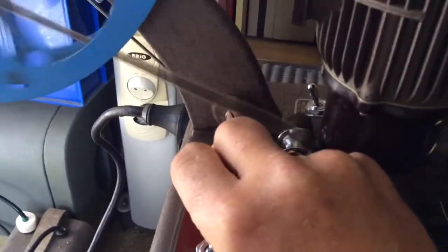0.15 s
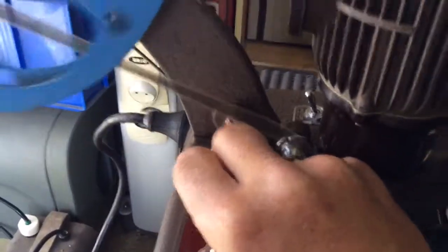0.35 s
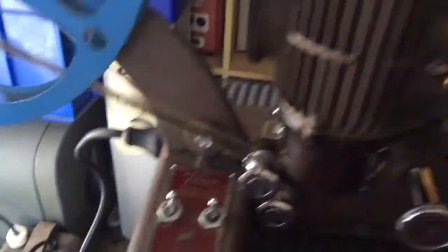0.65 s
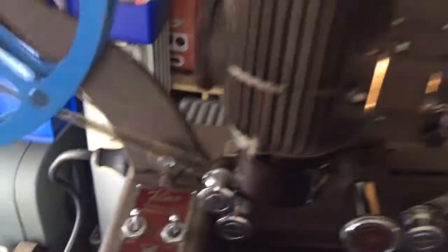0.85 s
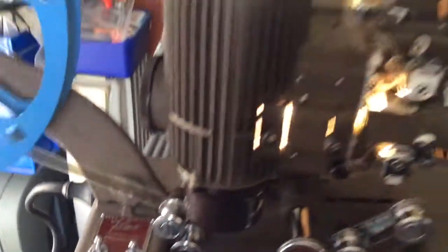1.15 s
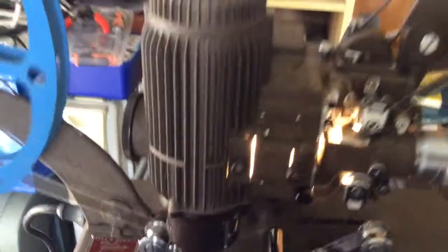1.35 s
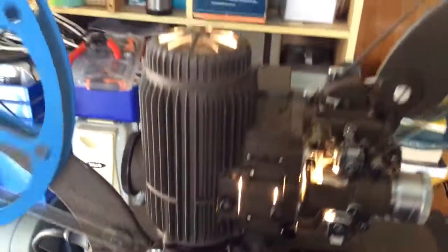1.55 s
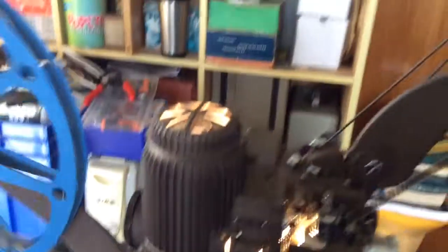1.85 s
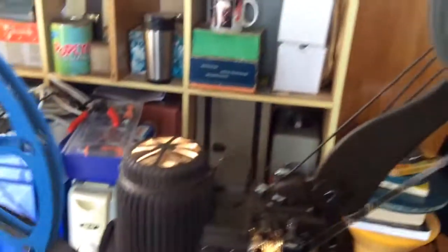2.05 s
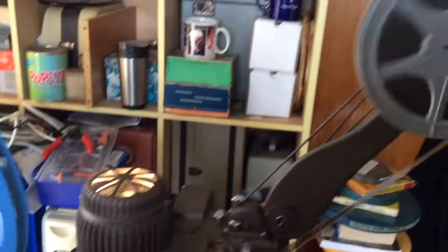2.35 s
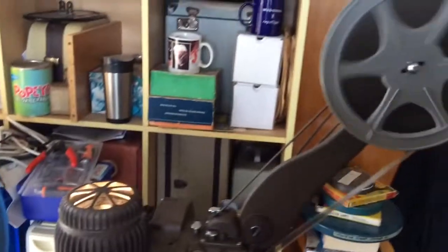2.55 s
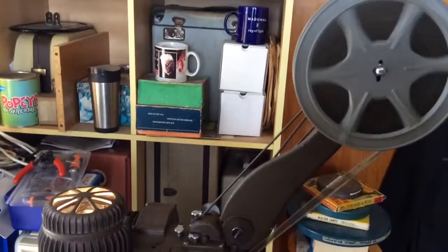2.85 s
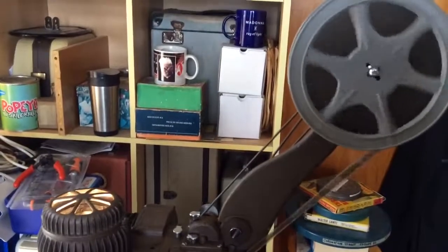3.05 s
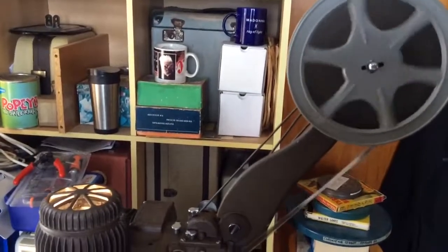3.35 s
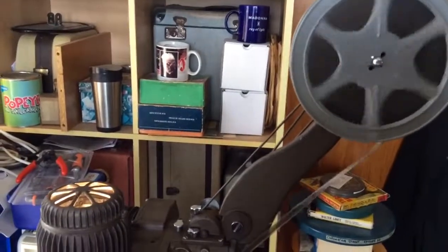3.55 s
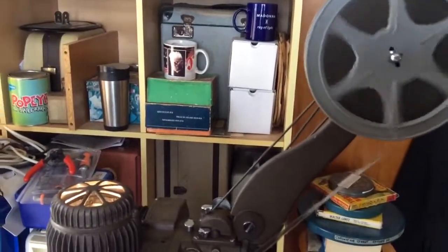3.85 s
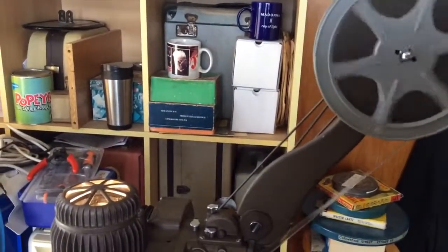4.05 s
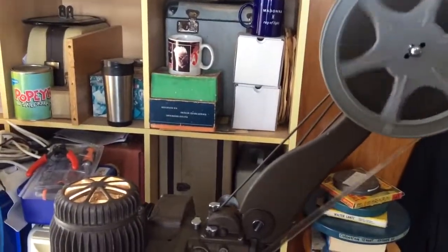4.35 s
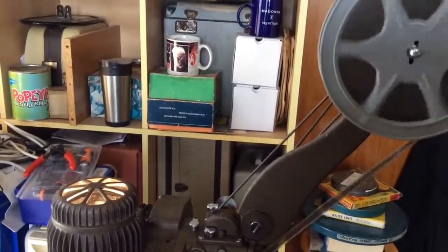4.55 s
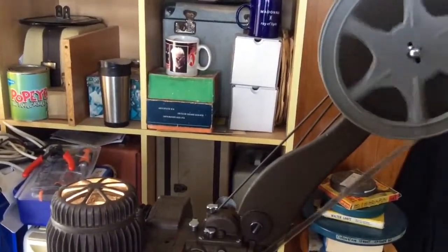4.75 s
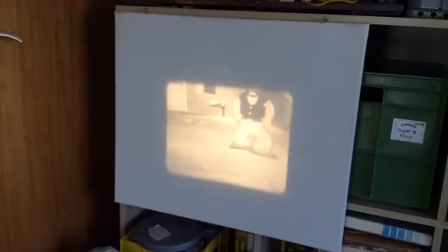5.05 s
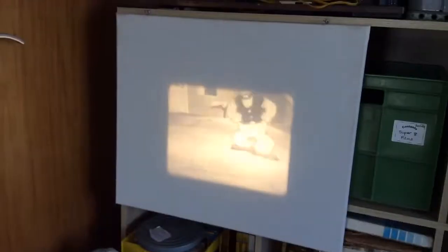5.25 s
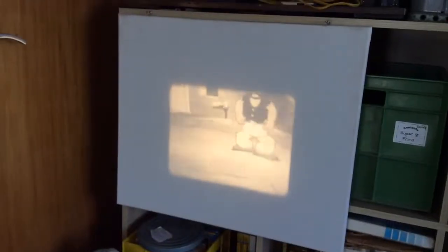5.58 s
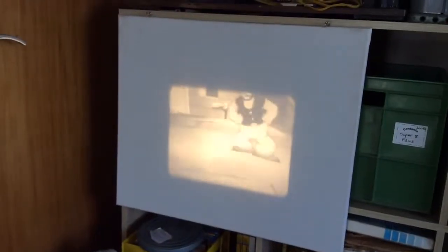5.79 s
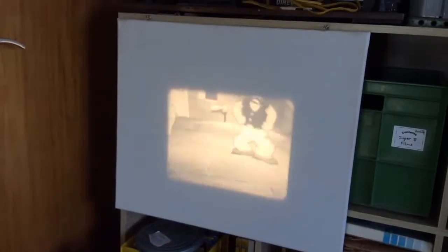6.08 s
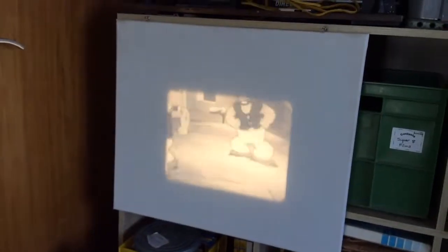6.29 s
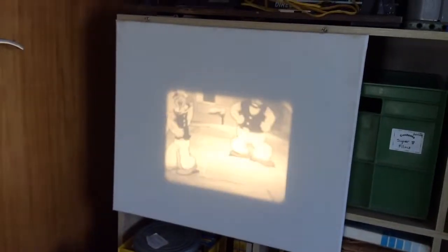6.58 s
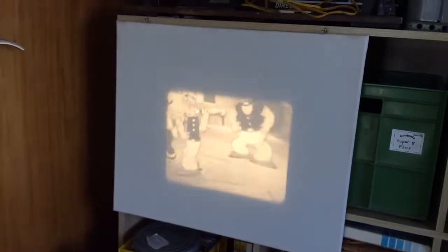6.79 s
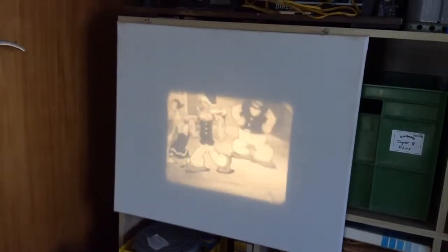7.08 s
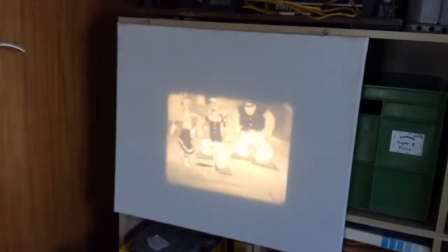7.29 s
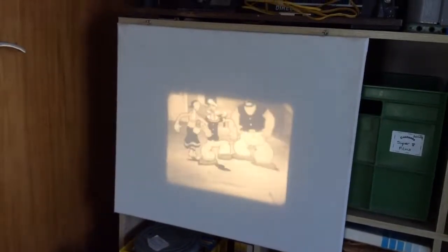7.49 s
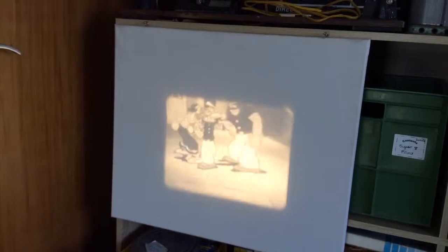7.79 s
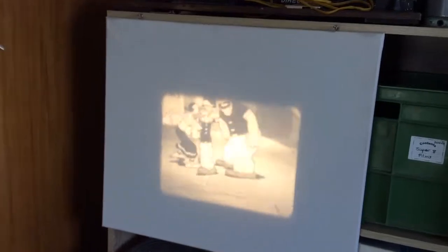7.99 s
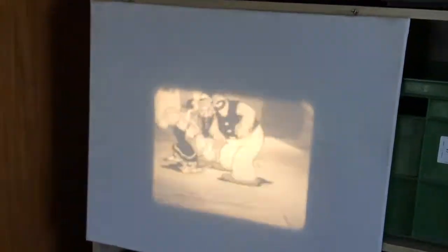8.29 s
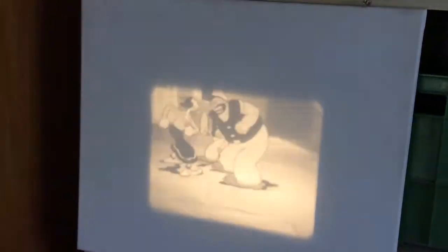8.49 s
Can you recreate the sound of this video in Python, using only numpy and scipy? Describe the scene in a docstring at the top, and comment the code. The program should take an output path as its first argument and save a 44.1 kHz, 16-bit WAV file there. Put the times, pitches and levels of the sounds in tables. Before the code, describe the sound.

An old film projector runs continuously in a small room, heard from very near. A steady hum around 230 Hz carries weaker gear tones, a grainy brush-and-gear whirr and rapid dry ticking, about 25 frame pulls a second, each a little cluster of metallic knocks with slightly uneven force. At 0.3 s a toggle switch snaps sharply, with a tiny bounce and short ring; the motor dips slightly in pitch and loudness, then slowly regains speed. From 0.6 to 1.2 s the whirr changes colour as the microphone passes the lamp housing; around 2 s crisp high film ticking comes forward, then by 2.9 s everything is softer. At 4.95 s an abrupt cut: the machine is far quieter, duller, reverberant, with blurred ticks and a lower motor note. A faint low knock falls at 7.35 s; from 7.6 s ticks edge forward while the hum fades, running to the end at about 8.6 s.

```python
"""A small room where an old film projector runs; its lamp clicks on sharply and the motor sags a little.
The motor is a hum with weaker gear tones; brushes and gears are grainy noise swelling with each turn.
The claw pulls one frame per three turns: decaying noise knocks shake the casting, gate and film.
Heard first close by, drawing slowly back, then abruptly from beside the screen, quieter and duller."""
import sys
import numpy as np
from scipy import signal
from scipy.fft import rfft, irfft
from scipy.io import wavfile
from scipy.ndimage import uniform_filter1d

SR = 44100
rng = np.random.default_rng(int(sys.argv[2]) if len(sys.argv) > 2 else 0)


def pcm_store(signal):
    """Save signal as 16-bit PCM."""
    levels = np.round(np.clip(np.atleast_2d(signal), -1, 1) * 32767)
    wavfile.write(sys.argv[1], SR, levels.astype(np.int16).T)


N = 380583
T = np.arange(N) / SR
CUT_S = 4.946  # from close by to the screen


def undb(db):
    """Decibels to gain."""
    return 10 ** (np.asarray(db) / 20)


def unit(x):
    """Scale to rms 1."""
    return x / np.sqrt(np.mean(x ** 2))


def noise():
    """White noise."""
    return rng.standard_normal(N)


def walk(rate_hz):
    """Smooth random drift with a spread near 1."""
    hold = max(int(SR / rate_hz), 2)
    steps = np.repeat(rng.standard_normal(N // hold + 1), hold)
    return 1.18 * uniform_filter1d(steps, hold)[:N]


def settle(start_s, time_s):
    """Exponential rise from 0 towards 1 after a start."""
    return 1 - np.exp(-np.maximum(T - start_s, 0) / time_s)


def swell(at_s, half_s):
    """Gaussian rise to 1 and fall; 1/e at half_s from the peak."""
    return np.exp(-((T - at_s) / half_s) ** 2)


def by_place(place, values):
    """Interpolate values given at places 0, 1, 2."""
    return np.interp(place, np.arange(len(values)), values)


def colour(x, points, size=4096):
    """Causal minimum-phase filter of unit power through (Hz, dB) points."""
    hz, db = np.transpose(points)
    grid_hz = np.maximum(np.arange(size // 2 + 1) * SR / size, 1)
    gain = undb(np.interp(np.log(grid_hz), np.log(hz), db))
    cepstrum = irfft(np.log(gain))
    cepstrum[1:size // 2] *= 2
    cepstrum[size // 2 + 1:] = 0
    response = irfft(np.exp(rfft(cepstrum)))
    return signal.oaconvolve(x, response / np.linalg.norm(response))[:N]


def ring(x, t60_s, wet_db, size=16384):
    """Add a dense decaying tail of resonances and reflections at unit filter power."""
    tail = rng.standard_normal(size) * np.exp(-np.log(1000) * T[:size] / t60_s)
    tail *= undb(wet_db) / np.linalg.norm(tail)
    tail[0] += 1
    return signal.oaconvolve(x, tail / np.linalg.norm(tail))[:N]


def resonate(x, modes):
    """Ring a few (Hz, width Hz, dB) resonances in parallel, scaled to rms 1."""
    return unit(sum(undb(db) * signal.lfilter(*signal.iirpeak(hz, hz / width_hz, fs=SR), x)
                    for hz, width_hz, db in modes))


# stand rumble spectrum: freq_hz, level_db
RUMBLE_SPECTRUM = [(20, -16), (50, -8.5), (80, -10.5), (120, -4), (180, 1), (260, -2), (380, -2),
                   (600, -22)]


def rumble(level_db):
    """Dull rumble of the stand: low-coloured noise."""
    return colour(noise(), RUMBLE_SPECTRUM) * undb(level_db)


# switch jolt on stand and housing, later a soft knock: start_s, level_db, pitch_hz, decay_s
THUMP_EVENTS = [(.305, -43, 68, .012), (.309, -24, 620, .009), (7.35, -52, 82, .04)]


def thumps():
    """Low, quickly dying swings: the switch jolts the stand and the housing; a soft low bump comes later."""
    out = np.zeros(N)
    for start_s, level_db, pitch_hz, decay_s in THUMP_EVENTS:
        age_s = np.maximum(T - start_s, 0)
        out += undb(level_db) * np.exp(-age_s / decay_s) * np.sin(2 * np.pi * pitch_hz * age_s)
    return out


# snap, stop and bounce: start_s, level_db, decay_s
SWITCH_BLOWS = [(.3047, -13.5, .002), (.3057, -10.5, .0016), (.3072, -13.5, .0016), (.3102, -21, .002)]
# switch body spectrum: freq_hz, level_db
SWITCH_SPECTRUM = [(30, -20), (75, -13), (150, -23), (400, -20), (650, -8), (1100, -18), (2600, -15),
                   (3200, 0), (4200, 0), (5400, -2.5), (7200, -7), (9000, -16), (12000, -19), (14000, -14),
                   (16000, -22)]


def lamp_switch():
    """The toggle snaps over, hits its stop and bounces; the housing rings briefly."""
    blows = np.zeros(N)
    for start_s, level_db, decay_s in SWITCH_BLOWS:
        fading = np.exp(-np.maximum(T - start_s, 0) / decay_s)
        blows += undb(level_db) * (T >= start_s) * fading
    return colour(ring(blows * noise(), t60_s=.09, wet_db=-6), SWITCH_SPECTRUM)


def shaft(speed_hz, first_stroke_s):
    """Turns of the motor shaft, counted from a claw stroke."""
    turns = np.cumsum(speed_hz) / SR
    return turns - np.interp(first_stroke_s, T, turns)


def near_shaft():
    """The lamp's load slows the free-running shaft; speed is partly won back as the lamp warms up."""
    free_hz, sag_hz, regain_hz = 77.034, 1.668, .979
    sag_at_s, sag_s, regain_s = .36, .06, 3
    speed_hz = free_hz - sag_hz * settle(sag_at_s, sag_s) + regain_hz * settle(sag_at_s, regain_s)
    return shaft(speed_hz, first_stroke_s=.0340)


def far_shaft():
    """By the screen the speed is still rising to its warm value."""
    warm_hz, lacking_hz, settle_s = 77.29, .39, .9
    return shaft(warm_hz - lacking_hz * (1 - settle(CUT_S, settle_s)), first_stroke_s=5.0475)


def tones(turns, table, hum_waver_db, waver_db, slip_cycles):
    """A clean hum at three cycles a turn plus weaker motor and gear tones; high ones waver most."""
    out = undb(hum_waver_db * walk(8.1)) * np.sin(2 * np.pi * 3 * turns)
    for multiple, level_db in table:
        looseness = min(multiple / 10, 1)
        phase = multiple * turns + looseness * slip_cycles * walk(7) + rng.random()
        gain = undb(level_db + np.sqrt(looseness) * waver_db * walk(12))
        out += gain * np.sin(2 * np.pi * phase)
    return np.sqrt(2) * out


# tones close by, levels re hum: shaft_multiple, at_switch_db, at_lamp_db, step_back_db
NEAR_TONES = [(1, -34, -35, -32), (4, -29, -29, -27), (8.22, -21, -21, -18), (9.01, -21, -21, -18),
              (13.7, -20, -19, -28), (14.52, -16, -16, -12.5), (15.02, -24, -18, -22),
              (21.88, -15, -20, -24), (37.04, -22, -23, -20), (38.04, -18, -18, -12),
              (58.08, -25, -19, -17), (59.08, -25, -23, -14.5), (64.08, -22, -19, -21)]


def near_motor(turns, place, hum_db):
    """Hum and gear tones close by; the balance of the tones follows the place."""
    table = [(multiple, by_place(place, levels_db)) for multiple, *levels_db in NEAR_TONES]
    return tones(turns, table, hum_waver_db=0.27, waver_db=2.0, slip_cycles=0.049) * undb(hum_db - 0.46)


# tones by the screen, levels re hum: shaft_multiple, level_db
FAR_TONES = [(1, -7.5), (4, -20), (7, -10), (8, -11), (9, -10), (14, -11), (14.5, -11), (15, -8),
             (15.82, -13), (19, -14), (27, -11), (29, -11), (42.33, -14)]


def far_motor(turns, hum_db):
    """Hum and gear tones by the screen, where the shaft's low note stands out."""
    return tones(turns, FAR_TONES, hum_waver_db=.4, waver_db=0.5, slip_cycles=.06) * undb(hum_db - 0.5)


def rasp(turns, repeat_db, throb_db, grain_db, size=512):
    """Brushes and gears: grainy rubbing with a throb once a turn, part of it the same every turn."""
    track = signal.resample(rng.standard_normal(size), size * 8)
    play_turns = 0.0052 * walk(30)
    track_turns = np.arange(len(track)) / len(track)
    repeating = unit(np.interp(turns + play_turns, track_turns, track, period=1))
    grains = unit(noise() * undb(grain_db * walk(1500)))
    throb = undb(throb_db * np.cos(2 * np.pi * (turns - .2)) + .5 * walk(10))
    return unit((grains + undb(repeat_db) * repeating) * throb)


# whirr spectra at the switch, over the lamp house, a step back: freq_hz, level_db
SWITCH_WHIRR = [(180, -39), (300, -14), (645, 1), (930, -5.5), (1100, -1), (1210, -10), (1430, -1),
                (2250, -7), (3580, -0.5), (6620, -4), (10900, -10.5), (12500, -21), (14700, -21),
                (16000, -46)]
LAMP_WHIRR = [(180, -46), (300, -19), (425, -15.5), (537, -3), (774, -7), (1120, -5), (1230, -10),
              (3760, -0.5), (4910, -1), (5800, -6), (9090, -13.5), (10400, -8.5), (12300, -14),
              (14700, -26), (16000, -37)]
BACK_WHIRR = [(180, -32), (300, -34), (440, -13), (645, -0.5), (885, -7.5), (1120, -6), (1280, -10.5),
              (2650, -7), (2880, -3.5), (4370, -4), (5700, -8.5), (7440, -11.5), (9090, -13),
              (14700, -13.5), (16000, -16)]
# motor housing resonances: freq_hz, width_hz, level_db
HOUSING_MODES = [(542, 42, 5), (633, 19, 2), (1068, 83, -5.5), (2970, 120, -4), (4530, 250, -3.5)]


def near_whirr(turns, place, whirr_db):
    """Rubbing rings in the machine; its colour crossfades with the place, over housing resonances."""
    rub = ring(rasp(turns, repeat_db=-14, throb_db=0.26, grain_db=2.0), t60_s=0.081, wet_db=-7)
    # the housing muffles the top
    rub = signal.sosfilt(signal.butter(1, 12000, fs=SR, output="sos"), rub)
    whirr = np.zeros(N)
    for index, spectrum in enumerate([SWITCH_WHIRR, LAMP_WHIRR, BACK_WHIRR]):
        share = np.maximum(1 - abs(place - index), 0)
        whirr += share * colour(rub, spectrum)
    housing_rub = rasp(turns, repeat_db=-16, throb_db=0.0, grain_db=2.5)
    whirr += undb(-14) * resonate(housing_rub, HOUSING_MODES)
    return whirr * undb(whirr_db + 2.5)


# whirr spectrum by the screen: freq_hz, level_db
SCREEN_WHIRR = [(180, -43), (300, -15.5), (416, -13.5), (541, -1.5), (647, -4), (775, 0.5), (855, -9),
                (1090, 1), (1230, -2), (2100, -2.5), (2600, -5.5), (3550, -0.5), (6000, -14.5), (9800, -5),
                (15000, -22.5)]
# resonances that carry across the room: freq_hz, width_hz, level_db
CARRYING_MODES = [(546, 60, -5), (1050, 55, -14), (3330, 670, -8)]


def far_whirr(turns, casting, whirr_db):
    """Rubbing and casting knocks blurred by reflections, plus resonances that carry."""
    rub = rasp(turns, repeat_db=-13.5, throb_db=-0.7, grain_db=1.5) + undb(-6.5) * casting
    whirr = colour(ring(rub, t60_s=.25, wet_db=-5.5), SCREEN_WHIRR)
    carrying_rub = rasp(turns, repeat_db=-8.5, throb_db=-1.5, grain_db=2.5)
    whirr += undb(-9) * resonate(carrying_rub, CARRYING_MODES)
    return whirr * undb(whirr_db + 3.0)


# frames pulled harder: time_s, pull_db (before weighting)
HARD_PULL_EVENTS = [(.19, 2.5), (.27, 2.5), (.35, 2.5), (.58, 1.5), (.62, 2.5), (1.22, 3), (1.26, 1.7),
                    (2.13, 1), (2.33, 2), (2.37, 3), (2.57, 2.5), (2.72, 2.5)]
# knocks of one frame: cycle_share, decay_s, casting_db, gate_db, film_db, screen_change_db
FRAME_STROKES = [(0, 0.0029, 1, 9.5, 1, -4), (.068, 0.0031, 0.5, -2.5, -2, 1),
                 (.2, 0.0036, -7.5, 3.5, -11, -4.5), (.37, .002, -5, -17, -2, 7),
                 (.415, 0.0018, -4, -12, -6, -4), (0.532, 0.0022, -12, -3, -6, -5),
                 (.73, 0.0026, -5.5, -35, -6, 13), (.87, .0015, -11, -31, -11, -6)]


def pull_forces(count, frames):
    """Pull force in dB per frame: slow swing as the film tightens and slackens, scatter, hard pulls."""
    tug_frames, tightest_frame = 11.31, 6.15
    tug = np.cos(2 * np.pi * (count - tightest_frame) / tug_frames)
    pull_db = 0.36 * tug + .5 * rng.standard_normal(len(count))
    for time_s, hard_db in HARD_PULL_EVENTS:
        pull_db[np.argmin(abs(count - np.interp(time_s, T, frames)))] = hard_db
    return pull_db


def claw(turns, by_screen, scatter_db, jitter_s, pull_weight=1.58):
    """Each frame repeats the same knocks with uneven force, shaking casting, gate and film."""
    frames = turns / 3
    count = np.arange(np.ceil(frames[0]) - 1, frames[-1])
    pull_db = pull_forces(count, frames)
    power = np.zeros((3, N))
    for share, decay_s, *part_db, screen_db in FRAME_STROKES:
        chance = rng.standard_normal((len(count), 2))
        when_s = np.interp(count + share, frames, T, left=-1, right=-1) + jitter_s * chance[:, 0]
        heard = (when_s > 0) & (when_s < T[-1])
        # a hard pull tells early in the cycle
        force_db = pull_weight * (1 - share) ** 2 * pull_db + scatter_db * chance[:, 1]
        blows = np.zeros(N)
        blows[(when_s[heard] * SR).astype(int)] = undb(force_db[heard]) ** 2
        fading = signal.lfilter([1], [1, -np.exp(-2 / (decay_s * SR))], blows + 1e-18)
        fading = np.abs(uniform_filter1d(fading, size=32))  # contact takes under a millisecond
        power += undb(np.array(part_db) + by_screen * screen_db)[:, None] ** 2 * fading
    return [unit(np.sqrt(p) * noise()) for p in power]


# steel gate and film spectra: freq_hz, level_db
GATE_SPECTRUM = [(5000, -34), (7600, -5.5), (8900, -8.5), (9900, -0.5), (10550, 2), (11200, -4),
                 (12000, -9.5), (16000, -29)]
FILM_SPECTRUM = [(8000, -23), (11800, -20), (13200, -1.5), (14700, -0.5), (15600, -4), (17000, -11)]


def gate_and_film(gate, film, gate_db, film_db):
    """Knocks ringing the steel gate and the film itself."""
    return colour(gate, GATE_SPECTRUM) * undb(gate_db) + colour(film, FILM_SPECTRUM) * undb(film_db)


# cast frame spectrum: freq_hz, level_db
CASTING_SPECTRUM = [(400, -29), (1100, -12.5), (2400, -9.5), (3000, 1.5), (3700, 4), (5000, -4.5),
                    (6000, -15), (7500, 3), (8800, -12), (12000, -21)]
# cast frame resonances: freq_hz, width_hz, level_db
CASTING_MODES = [(1980, 760, -5.5), (3770, 140, -4), (4780, 230, -2)]


def near_knocks(turns, casting_db, gate_db, film_db):
    """Dry ticking of cast frame, gate and film."""
    casting, gate, film = claw(turns, by_screen=False, scatter_db=1.4, jitter_s=0.0002)
    knocks = colour(casting, CASTING_SPECTRUM) * undb(casting_db + 1.3)
    knocks += resonate(casting, CASTING_MODES) * undb(casting_db - 4.2)
    knocks += gate_and_film(gate, film, gate_db - 1.0, film_db + 1.0)
    return ring(knocks, t60_s=.15, wet_db=-14)


# base levels at the switch, over the lamp house, a step back:
# hum_db, whirr_db, casting_db, gate_db, film_db, rumble_db
NEAR_LEVELS = [(-31.5, -30, -37, -31.5, -41.5, -49.5), (-32.3, -30.2, -40.5, -34.5, -41.5, -49.5),
               (-35, -34, -41.5, -42, -41, -54.5)]
# change over the open gate: hum_db, whirr_db, casting_db, gate_db, film_db, rumble_db
OVER_GATE_CHANGE = (-2, -2.5, 2, 0, 5.5, -2)


def near_levels(place):
    """Part levels: follow the place, shift over the open gate, dip as the cold lamp draws a surge."""
    over_gate = swell(at_s=2.05, half_s=0.47)
    surge_db = -2.5 * swell(at_s=.46, half_s=0.13)
    return [by_place(place, levels_db) + change_db * over_gate + surge_db
            for levels_db, change_db in zip(np.transpose(NEAR_LEVELS), OVER_GATE_CHANGE)]


# base levels by the screen: hum_db, whirr_db, gate_db, film_db
SCREEN_LEVELS = (-51, -43.5, -48.5, -48)


def screen_levels():
    """Part levels: steady until the listener leans to the screen; hum fades, ticks come forward."""
    lean_at_s, lean_db_per_s = 7.64, (-3, 0.5, 3, 3)  # hum, whirr, gate, film
    leaning_s = np.maximum(T - lean_at_s, 0)
    return [level_db + slope * leaning_s for level_db, slope in zip(SCREEN_LEVELS, lean_db_per_s)]


def by_the_screen():
    """The machine from across the room: reflections blur the ticks."""
    turns = far_shaft()
    hum_db, whirr_db, gate_db, film_db = screen_levels()
    casting, gate, film = claw(turns, by_screen=True, scatter_db=1.5, jitter_s=.0003)
    knocks = ring(gate_and_film(gate, film, gate_db + 2.5, film_db - 0.5), t60_s=0.36, wet_db=-0.5)
    return rumble(-58) + far_motor(turns, hum_db) + far_whirr(turns, casting, whirr_db) + knocks


# way round the machine: time_s, place (0 switch, 1 lamp house, 2 a step back)
LISTENER_PATH = [(.55, 0), (1.2, 1), (1.9, 1), (2.9, 2)]


def close_by():
    """The machine at arm's length: dry ticking over a whirr whose colour changes with the place."""
    turns = near_shaft()
    time_s, places = np.transpose(LISTENER_PATH)
    place = np.interp(T, time_s, places)
    hum_db, whirr_db, casting_db, gate_db, film_db, rumble_db = near_levels(place)
    motor = near_motor(turns, place, hum_db)
    whirr = near_whirr(turns, place, whirr_db)
    return rumble(rumble_db) + motor + whirr + near_knocks(turns, casting_db, gate_db, film_db)


def scene():
    """Close to the machine, then at once by the screen."""
    near = close_by() + lamp_switch()
    return (np.where(T < CUT_S, near, by_the_screen()) + thumps())[None]


def record(dry):
    """Steep low-pass, a little lower by the screen."""
    near, far = (signal.sosfilt(signal.ellip(10, .2, 70, cutoff_hz, fs=SR, output="sos"), dry)
                 for cutoff_hz in (15850, 15050))
    return np.where(T < CUT_S, near, far)


dry = scene()
out = record(dry)
pcm_store(out)
```